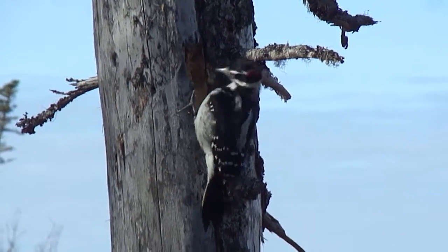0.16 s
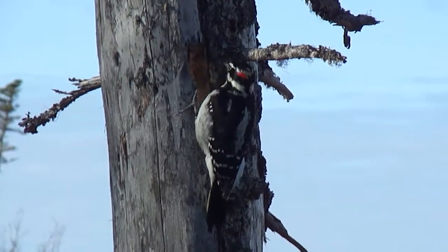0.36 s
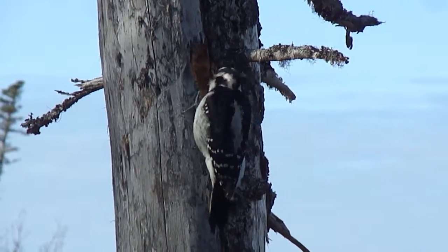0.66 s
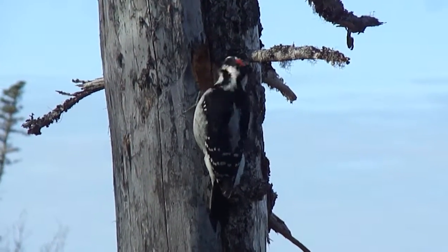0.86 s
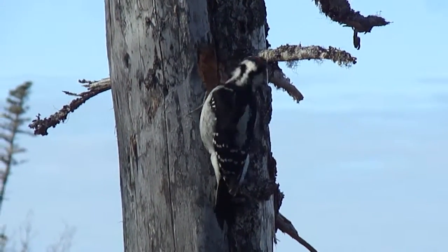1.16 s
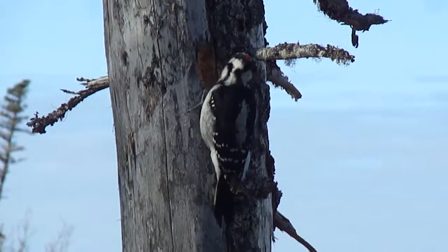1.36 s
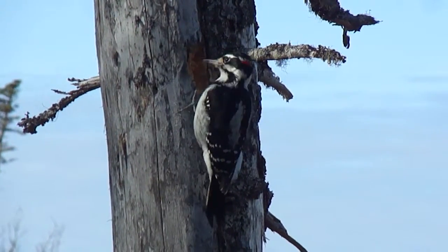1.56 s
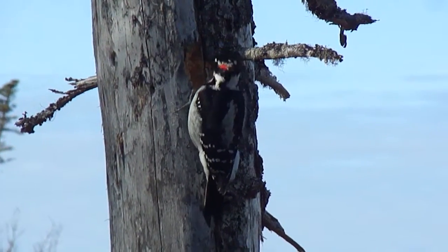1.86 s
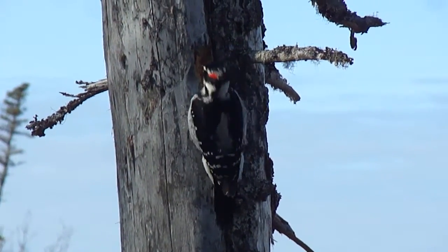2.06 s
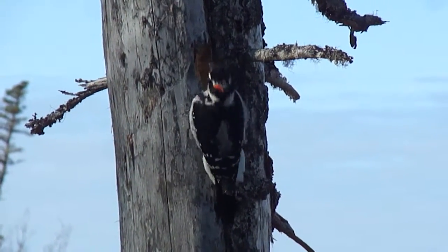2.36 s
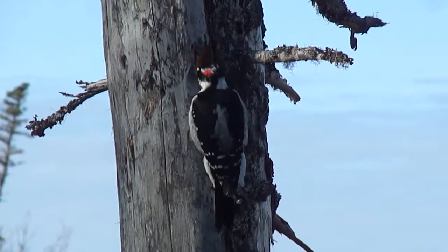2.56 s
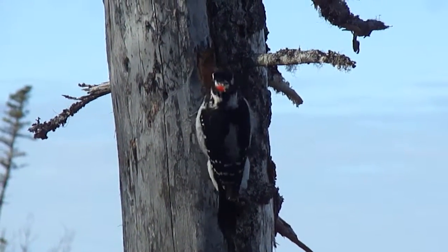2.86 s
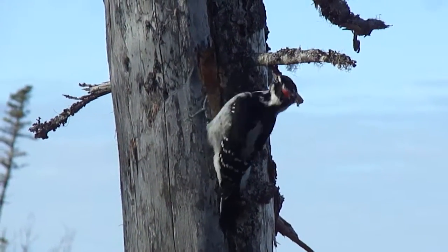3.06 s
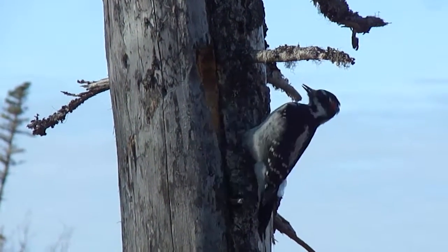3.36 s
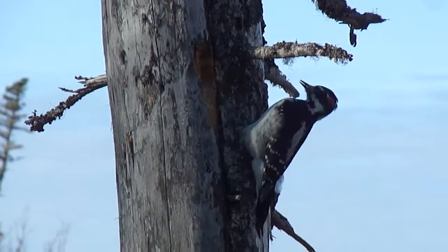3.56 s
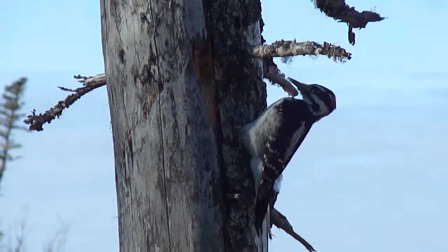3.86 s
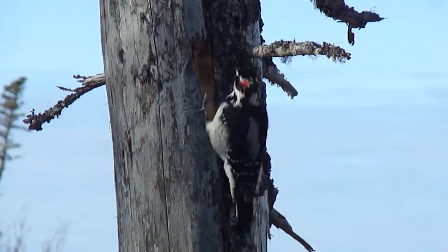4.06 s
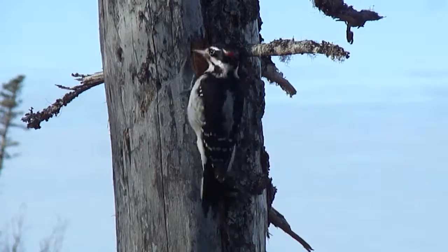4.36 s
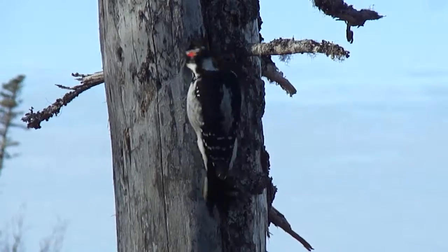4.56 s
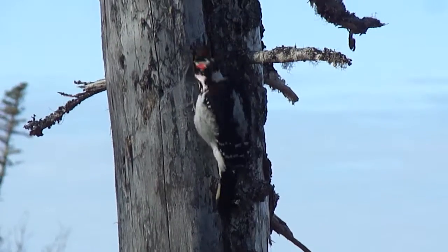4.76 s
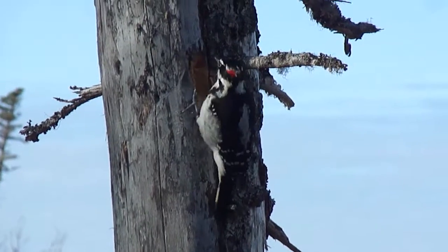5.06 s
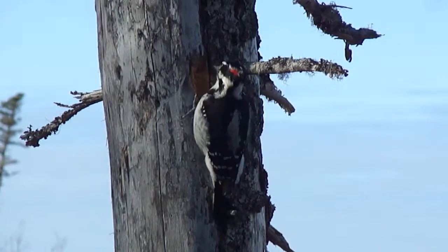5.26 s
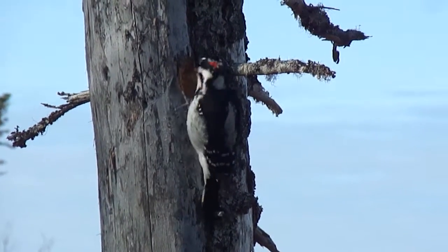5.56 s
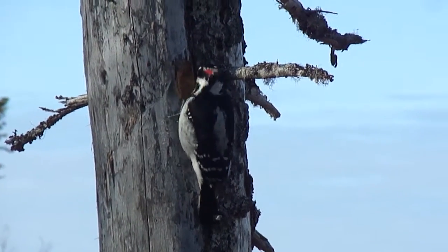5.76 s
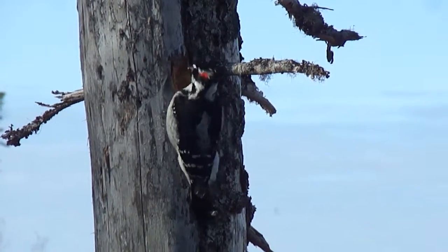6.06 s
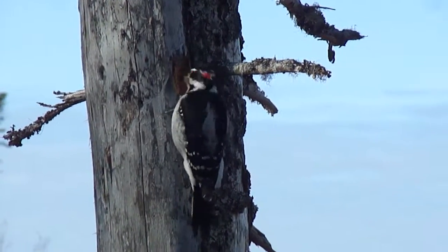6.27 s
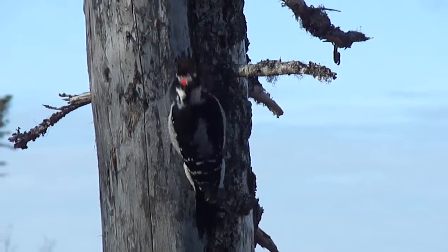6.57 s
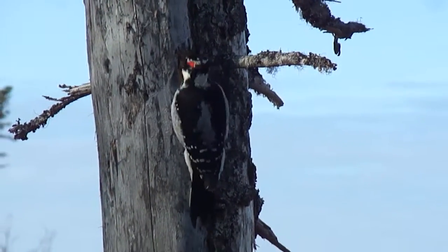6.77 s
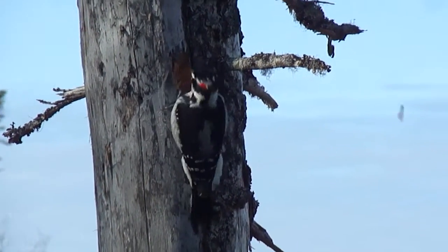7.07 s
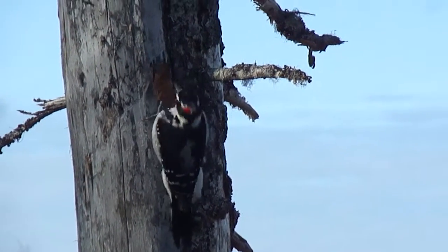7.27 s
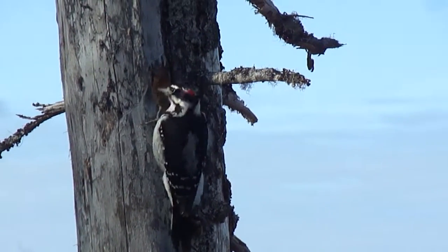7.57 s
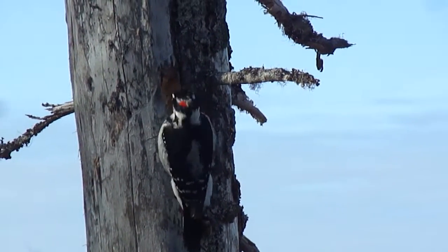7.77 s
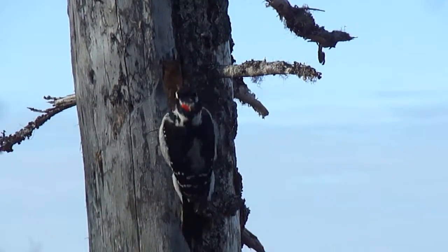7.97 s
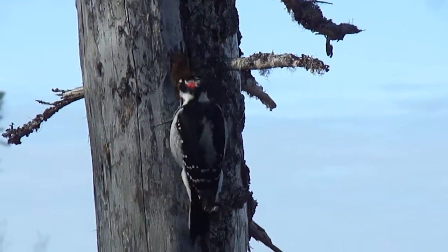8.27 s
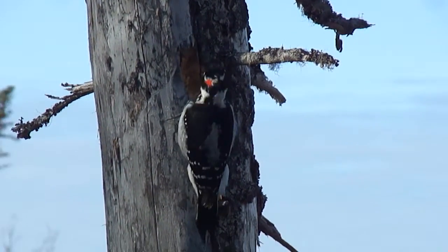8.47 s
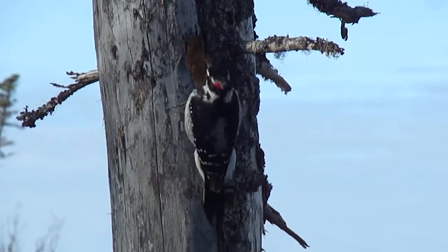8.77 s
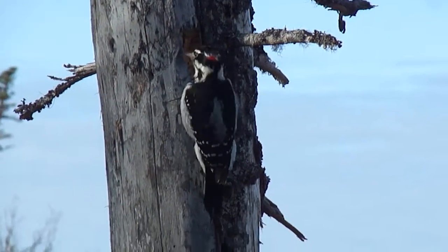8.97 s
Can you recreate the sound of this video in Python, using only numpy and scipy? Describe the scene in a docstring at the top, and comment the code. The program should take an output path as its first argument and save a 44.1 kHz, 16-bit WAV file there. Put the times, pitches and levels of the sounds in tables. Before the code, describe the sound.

Uneven woodpecker taps ring briefly in a dead tree a few metres off, against steady air, recorder hiss and a very faint whine and ticking. The pecking thins as claws lightly scratch the bark, then picks up again. Near the end come a few sharp mechanical clicks and a short slide beside the microphone, followed by low wind buffeting and stronger knocks.

```python
"""Some metres from the microphone a woodpecker taps and picks at a dead trunk throughout, each blow
ringing the wood, over distant air, recorder hiss, a thin whine and a faint ticking. From 3 to 5 seconds
its claws scrape the bark as it shifts. Around 7 seconds a small hard mechanism clicks and slides close
to the microphone. From about 7.7 seconds wind buffets the microphone while the bird hammers on."""
import sys
import numpy as np
from scipy import signal
from scipy.fft import rfft, irfft, next_fast_len
from scipy.io import wavfile

SR = 44100
rng = np.random.default_rng(int(sys.argv[2]) if len(sys.argv) > 2 else 0)


def transcribe(u):
    """Save the signal u as a 16-bit wav file named by the first command-line argument.

    u: samples, shape (n,) or (channels, n), limited to [-1, 1]; the rate is SR.
    q: integer samples, one column per channel.
    """
    v = np.clip(np.atleast_2d(u).T, -1, 1)
    q = np.round(v * 32767).astype(np.int16)
    wavfile.write(sys.argv[1], SR, q)


N = 402633
CONTACT_LAG_S = 0.00098   # a contact swells a moment after the first touch

# Bill on wood, some metres off. Each row: start in seconds, knock in dB, its pitch in Hz, surface ring
# in dB, its pitch in Hz, chip crack in dB, its pitch in Hz, bill tick in dB. Levels are relative.
PECKS = [(0.115, -32, 653, -29.5, 1790, -38, 3220, -45.5), (0.272, -35, 544, -28.5, 1880, -35.5, 3370, -46),
         (0.333, -37, 830, -34.5, 2870, -30.5, 4130, -51), (0.476, -47, 707, -41.5, 1510, -53, 4900, -58),
         (0.855, -45, 549, -42, 1890, -51, 3210, -61), (1.012, -40, 630, -43.5, 1990, -49, 5100, -60),
         (1.126, -37.5, 555, -25.5, 1980, -44, 3720, -46),
         (1.272, -41, 580, -33.5, 2480, -42.5, 3650, -43.5), (1.403, -40.5, 700, -40, 1770, -50, 4180, -63),
         (1.521, -33.5, 570, -31, 1980, -38, 3160, -47), (1.576, -53, 756, -47, 2880, -43, 4400, -63),
         (1.994, -35.5, 840, -38.5, 1980, -29.5, 4670, -43.5),
         (2.169, -26.5, 536, -32, 1730, -63, 3810, -56), (2.342, -28, 541, -29, 1940, -40, 3350, -48),
         (2.483, -51, 620, -43, 1700, -52, 4420, -57), (2.515, -22, 837, -26.5, 2310, -47, 3230, -46),
         (2.745, -69, 517, -59, 3270, -43.5, 3700, -65), (2.792, -16.5, 637, -25.5, 1740, -39, 3270, -34.5),
         (3.199, -44, 560, -63, 1880, -56, 3490, -59), (3.369, -64, 670, -48, 2000, -45, 3600, -62),
         (3.976, -58, 536, -46, 1620, -40.5, 5760, -50), (4.119, -46, 587, -43, 2140, -47, 5790, -57),
         (4.133, -48, 441, -48, 2150, -47, 3600, -55), (4.401, -60, 406, -48, 1650, -61, 3330, -44),
         (4.419, -57, 470, -52, 2400, -67, 4670, -49), (4.622, -36.5, 428, -39, 2540, -46, 3220, -56),
         (4.796, -37.5, 664, -41.5, 2470, -49, 5790, -59), (4.826, -56, 382, -41.5, 2860, -43.5, 3670, -54),
         (4.849, -63, 759, -47, 2420, -52, 3680, -48), (4.868, -53, 430, -24.5, 1850, -37, 4410, -41),
         (4.891, -58, 600, -40, 2000, -55, 3600, -60), (4.903, -58, 600, -43, 1800, -56, 3600, -62),
         (4.952, -51, 692, -45, 1730, -47, 4360, -63), (4.989, -58, 447, -42.5, 1810, -49, 3240, -60),
         (5.442, -32.5, 440, -32.5, 2650, -42, 4110, -40),
         (5.573, -43.5, 670, -36.5, 1790, -35.5, 3230, -46), (5.673, -49, 900, -42, 2580, -43, 5600, -42),
         (5.68, -59, 740, -31, 2520, -33.5, 3600, -36), (5.731, -59, 624, -52, 2290, -51, 3950, -43.5),
         (5.807, -38.5, 680, -27.5, 2520, -42, 3550, -49), (5.814, -38, 870, -39, 2020, -48, 3750, -53),
         (6.126, -45, 546, -48, 1620, -54, 5400, -63), (6.185, -31.5, 690, -28, 2330, -47, 3330, -51),
         (6.324, -31.5, 536, -25, 1850, -35, 3220, -47), (6.671, -35, 650, -35, 1730, -56, 5860, -51),
         (6.729, -58, 573, -41, 2100, -56, 4870, -58), (7.001, -47, 815, -41, 1600, -34, 5000, -56),
         (7.208, -18, 626, -28, 2480, -42, 3360, -43), (7.416, -17.5, 620, -25.5, 1850, -39, 3300, -48),
         (7.451, -42, 643, -34, 1910, -38.5, 5900, -45.5), (7.488, -40.5, 666, -36, 2450, -44, 3430, -47),
         (7.789, -61, 595, -32, 1860, -51, 3730, -44), (7.807, -55, 807, -59, 1770, -58, 3880, -46),
         (7.918, -26, 590, -21.5, 1770, -49, 3250, -40.5), (8.05, -59, 538, -40, 1990, -46, 4700, -49),
         (8.097, -26, 517, -26.5, 1710, -38, 3500, -43), (8.287, -17, 614, -24, 1720, -58, 3700, -49),
         (8.318, -50, 665, -39, 1900, -42, 5730, -44.5), (8.363, -40, 384, -53, 2560, -47, 3690, -62),
         (8.432, -52, 513, -40.5, 2370, -45, 3670, -63), (8.695, -17.5, 615, -29.5, 1780, -36.5, 3400, -41),
         (8.76, -49, 835, -39, 1840, -50, 4970, -59), (8.932, -20, 865, -27, 1860, -41.5, 5790, -36.5)]
# Modes of the dead trunk. Each row: pitch in Hz, relative level in dB, 60 dB decay time in seconds.
TRUNK_MODES = [(452.5, -3.5, 0.099), (564.3, 6, 0.057), (693, 6, 0.052), (715, 2, 0.042), (779, 3.5, 0.054),
               (898, 0, 0.048)]
# Modes of the hollow under the bark. Each row: pitch in Hz, relative level in dB, decay in seconds.
HOLLOW_MODES = [(971, -5.5, 0.024), (1276, -1, 0.014), (1444, -2.5, 0.0053)]
# Returns from the ground and a near trunk. Each row: delay in seconds, relative level in dB.
ECHOES = [(.008, -12), (.0185, -17)]
# Claws on bark. Each row: start in seconds, length in seconds, level in dB.
SCRAPES = [(3.1, 0.11, -61), (3.29, .025, -53), (3.351, 0.035, -56), (3.97, .015, -60), (4.08, .07, -57.5),
           (4.79, .26, -60)]
# Clicks close to the microphone. Each row: start in seconds, case ring in dB, its pitch in Hz,
# then bar, jolt, plate, rattle, crack and tick in dB. Levels are relative.
CLICKS = [(6.762, -30, 1420, -52, -53, -23, -35.5, -21, -25.5),
          (6.7912, -11.5, 1360, -24.5, -21.5, -10, -25, -24, -34),
          (6.8168, -24, 1470, -33.5, -39, -25, -36, -36, -57),
          (6.861, -53, 1270, -62, -44, -38, -38.5, -30.5, -42),
          (7.132, -11, 1395, -19, -52, -18, -53, -22, -46),
          (7.2371, -23, 1260, -50, -34, -16.5, -50, -19, -33),
          (7.2635, -41, 1300, -48, -35, -41, -47, -51, -57)]
# Modes of the mechanism's plate. Each row: pitch in Hz, relative level in dB, decay in seconds.
PLATE_MODES = [(2257, 0.5, 0.0097), (2430, -5, 0.016), (3000, -14, 0.013)]
# Hiss of the sliding part. Each row: frequency in Hz, relative level in dB.
SLIDE_SPECTRUM = [(880, -21), (1500, 1), (2470, -3), (5510, -6.5), (5990, -13), (8840, -8.5), (10900, -17),
                  (14100, -47), (22000, -120)]
# Gusts at the microphone. Each row: time in seconds, level in dB.
GUST_LEVELS = [(7.68, -83), (7.732, -48), (7.84, -90), (7.884, -51), (7.97, -45.5), (7.995, -58),
               (8.07, -46), (8.095, -53), (8.14, -43), (8.26, -62.5), (8.354, -35), (8.408, -43),
               (8.444, -62), (8.47, -42), (8.6, -39), (8.75, -44.5), (8.95, -40.5), (9.05, -44),
               (9.13, -36)]
# Rumble of the gusts. Each row: frequency in Hz, relative level in dB.
GUST_SPECTRUM = [(12, -54), (20, -28), (87, 0), (151, -0.5), (295, -9.5), (354, -18), (386, -10),
                 (513, -27), (600, -42), (780, -52), (1320, -120)]
# Single eddies that thump the microphone. Each row: centre in seconds, envelope peak in dB, pitch in Hz.
EDDIES = [(8.355, -24.5, 216), (8.379, -28.5, 191), (8.399, -30.5, 210.0), (8.482, -31, 200.0),
          (8.516, -37, 140.0), (8.542, -26, 184), (8.591, -23, 140.0), (8.632, -26, 217),
          (8.668, -21.5, 182), (8.792, -28, 169), (8.828, -26, 181), (8.862, -32, 161), (8.882, -20.5, 152),
          (8.98, -27.5, 192), (9.078, -27.5, 180.0), (9.094, -28.5, 190.0), (9.122, -25.5, 179)]
# Ticking inside the recorder. Each row: time in seconds, relative level in dB.
TICKING_LEVELS = [(0, -40), (5, -42), (9.13, -44.5)]
# Distant air and recorder hiss together. Each row: frequency in Hz, relative level in dB.
AIR_SPECTRUM = [(12, -31), (20, -21), (71, -13), (238, 0.5), (539, 1.5), (720, 1), (1100, -3), (1550, -3),
                (2180, -5.5), (2360, -4), (3230, -8.5), (5200, -10.5), (6760, -12), (8130, -13.5),
                (10900, -15.5), (14100, -65), (22000, -120)]
# Two faint tones close in pitch. Each row: pitch in Hz, rms level in dB about which the tone wavers.
WHINE_TONES = [(7852, -80.5), (7882, -77)]


def woodpecker():
    """Some metres off, the bill knocks on dead wood, rings trunk, hollow and surface, and snaps fibres."""
    start_s, knock_db, knock_hz, surface_db, surface_hz, chip_db, chip_hz, tick_db = np.transpose(PECKS)
    trunk_db = knock_db - 14 - 3 * np.log2(knock_hz / 600)   # higher, thinner spots stir the trunk less
    hollow_db = 4.5 + 0.39 * knock_db + 0.61 * surface_db   # the hollow lies between knock and surface
    tick_hz = rng.uniform(6300, 10680, len(start_s))   # the bill tip
    pecks = from_db(np.c_[knock_db] + 7.5) * ring(knock_hz, t60=0.016, rise_s=0.00075)
    pecks += strike(TRUNK_MODES, trunk_db, rise_s=0.0017, wander=0.049)
    pecks += crack(knock_db - 7, low_hz=383, high_hz=930, t60=0.068)
    pecks += strike(HOLLOW_MODES, hollow_db, rise_s=0.001, wander=0.059)
    pecks += from_db(np.c_[surface_db] + 9) * ring(surface_hz, t60=0.012, rise_s=0.00093)
    pecks += crack(surface_db + 2.5, low_hz=1600, high_hz=2770, t60=0.018)
    pecks += crack(surface_db - 19, low_hz=1150, high_hz=4770, t60=0.23)   # torn fibres crackle on
    pecks += from_db(np.c_[chip_db] + 14.5) * ring(chip_hz, t60=0.0046, rise_s=0.00053)
    pecks += crack(chip_db + 4, low_hz=2830, high_hz=6050, t60=0.0091)
    pecks += from_db(np.c_[tick_db] + 10.5) * ring(tick_hz, t60=0.0038, rise_s=0.00033)
    pecks += crack(tick_db + 8, low_hz=5830, high_hz=12700, t60=0.012)
    # a thin trunk radiates little bass
    return filtered(place(start_s + CONTACT_LAG_S, pecks), "high", hz=280, order=2)


def woods(direct):
    """The woods send two dull echoes and a dying diffuse tail back to the microphone."""
    t = np.arange(SR // 2) / SR
    tail_db, tail_t60 = -37, 0.22
    returns = from_db(tail_db - 60 * t / tail_t60) * rng.standard_normal(len(t)) * (t > 0.005)
    for delay_s, db in ECHOES:
        returns[round(delay_s * SR)] += from_db(db)
    dull = filtered(direct, "low", hz=690, order=1)
    return signal.fftconvolve(dull, returns)[:N]


def claws():
    """Over on the trunk, claws scratch the bark in uneven grains; each scrape swells, holds and fades."""
    grains = rng.standard_normal(N) * from_db(6.2 * drift(110))
    t = np.arange(N) / SR
    edge_s = 0.011
    strokes = sum(from_db(db) * np.interp(t, [s - edge_s, s, s + length, s + length + edge_s], [0, 1, 1, 0])
                  for s, length, db in SCRAPES)
    return strokes * rms_one(filtered(grains, "band", hz=[1500, 7000], order=1))


def mechanism_clicks():
    """Close up, hard clicks ring a case, bar and plate, rattle, and jolt the microphone."""
    start_s, case_db, case_hz, bar_db, jolt_db, plate_db, rattle_db, crack_db, tick_db = np.transpose(CLICKS)
    plate = sum(from_db(db) * ring([hz], t60, rise_s=0.00038) for hz, db, t60 in PLATE_MODES)
    parts = from_db(np.c_[case_db]) * ring(case_hz, t60=0.023, rise_s=0.00016)
    parts += from_db(np.c_[bar_db] - 0.5) * ring([1038], t60=0.1, rise_s=0.00097)
    parts += from_db(np.c_[plate_db] + 2.5) * plate
    parts += crack(rattle_db, low_hz=910, high_hz=3200, t60=0.096)
    parts += crack(crack_db + 2.5, low_hz=2800, high_hz=6018.5, t60=0.011)
    parts += crack(tick_db + 14, low_hz=6300, high_hz=9700, t60=0.0044)
    jolt = from_db(np.c_[jolt_db] + 3.5) * ring([480], t60=0.013, rise_s=0.00023)
    # small parts radiate no bass; only the jolt reaches down
    clicks = filtered(parts, "high", hz=800, order=2) + filtered(jolt, "high", hz=120, order=1)
    return place(start_s + CONTACT_LAG_S, clicks)


def mechanism_slide():
    """Between two of the near clicks a part slides with a rough hiss that swells and holds."""
    friction = rng.standard_normal(N) * from_db(1.1 * drift(200))
    swell = level([(7.15, -76.5), (7.181, -38.5), (7.24, -38.5)])
    return swell * coloured(friction, SLIDE_SPECTRUM)


def wind():
    """Wind right on the microphone: lumpy rumble, each strong eddy a pull and a push of about one cycle."""
    lumps = rng.standard_normal(N) * from_db(5.5 * drift(52))
    rumble = level(GUST_LEVELS) * coloured(lumps, GUST_SPECTRUM)
    centre_s, db, hz = np.transpose(EDDIES)
    lead_s = 0.02
    cycles = np.c_[hz] * (np.arange(SR // 25) / SR - lead_s)
    thumps = from_db(np.c_[db]) * np.sin(2 * np.pi * cycles) * np.exp(-(cycles / 0.48) ** 2)
    return rumble + place(centre_s - lead_s, thumps)


def recorder_ticking():
    """Faint, evenly spaced pings inside the recorder, slightly uneven in strength and pitch."""
    first_s, ticks_per_s = 0.0118, 59.94
    start_s = np.arange(first_s, N / SR, 1 / ticks_per_s)
    chance = rng.normal(0, 1, (len(start_s), 2))
    strength = from_db(2 * chance[:, :1])
    hz = 5150 * (1 + chance[:, 1] / 40)
    return level(TICKING_LEVELS) * place(start_s, strength * ring(hz, t60=0.0038, rise_s=0.00031))


def air_and_hiss():
    """Far behind the bird, smooth air blends with recorder hiss and a faint wavering whine."""
    t = np.arange(N) / SR
    whine = sum(from_db(db + 2.5 * drift(9)) * np.sqrt(2) * np.sin(2 * np.pi * hz * t)
                for hz, db in WHINE_TONES)
    return from_db(-53) * coloured(rng.standard_normal(N), AIR_SPECTRUM) + whine


def ring(hz, t60, rise_s):
    """One sine per pitch, swelling while the contact lasts and dying by 60 dB in t60 seconds."""
    t = np.arange(SR // 8) / SR
    swell = 1 - np.exp(-(t / rise_s) ** 2)
    return np.sin(2 * np.pi * np.c_[hz] * t) * from_db(-60 * t / t60) * swell


def strike(modes, db, rise_s, wander):
    """One row per blow: each mode rings with its own strength, its pitch shifted by grip and spot."""
    chance = rng.normal(0, 1, (len(db), 2, len(modes)))
    blows = 0
    for k, (hz, mode_db, t60) in enumerate(modes):
        strength = from_db(np.c_[db + mode_db + 2 * chance[:, 0, k]])
        blows += strength * ring(hz * (1 + wander * chance[:, 1, k]), t60, rise_s)
    return blows


def crack(db, low_hz, high_hz, t60):
    """One row per blow: a short burst of band noise as fibres or parts snap."""
    t = np.arange(SR // 8) / SR
    noise = rng.standard_normal((len(db), len(t))) * from_db(-60 * t / t60)
    burst = filtered(noise, "band", hz=[low_hz, high_hz], order=3)
    power = np.sum(burst ** 2, axis=1, keepdims=True) / (t60 * SR / 60)
    return from_db(np.c_[db]) * burst / np.sqrt(power)


def place(times, rows):
    """Lay each row down at its time in seconds."""
    track = np.zeros(N + rows.shape[1])
    for s, row in zip(times, rows):
        start = round(s * SR)
        track[start:start + len(row)] += row
    return track[:N]


def level(curve):
    """Gain along a curve of seconds and dB, silent outside it."""
    s, db = np.transpose(curve)
    return from_db(np.interp(np.arange(N) / SR, s, db, left=-150, right=-150))


def coloured(noise, spectrum):
    """Shape a noise by a spectrum of Hz and dB, at unit rms."""
    size = next_fast_len(N)
    hz, db = np.transpose(spectrum)
    bin_hz = np.arange(1, size // 2 + 2) * SR / size
    shape_db = np.interp(np.log(bin_hz), np.log(hz), db)
    return rms_one(irfft(rfft(noise, size) * from_db(shape_db), size)[:N])


def drift(rate):
    """A random wander of unit rms, changing about rate times a second."""
    pole = np.exp(-2 * np.pi * rate / SR)
    wander = signal.lfilter([1], [1, -2 * pole, pole * pole], rng.standard_normal(N + SR))
    return rms_one(wander)[SR:]


def filtered(x, kind, hz, order):
    """Low-, high- or band-pass."""
    return signal.sosfilt(signal.butter(order, hz, kind, fs=SR, output="sos"), x)


def from_db(db):
    """Decibels to gain."""
    return 10 ** (np.asarray(db) / 20)


def rms_one(x):
    """Scale to unit rms."""
    return x / np.sqrt(np.mean(x ** 2) + 1e-20)


def scene():
    """Bird, near sounds and background meet at one microphone."""
    pecks = woodpecker()
    bird = pecks + woods(pecks) + claws()
    near = mechanism_clicks() + mechanism_slide() + wind()
    background = recorder_ticking() + air_and_hiss()
    return (bird + near + background)[None]


def record(dry):
    """The treble is cut steeply above about 11 kHz."""
    top_cut = signal.ellip(12, 0.5, 60, 11020, fs=SR, output="sos")
    return signal.sosfilt(top_cut, dry)


dry = scene()
out = record(dry)
transcribe(out)
```